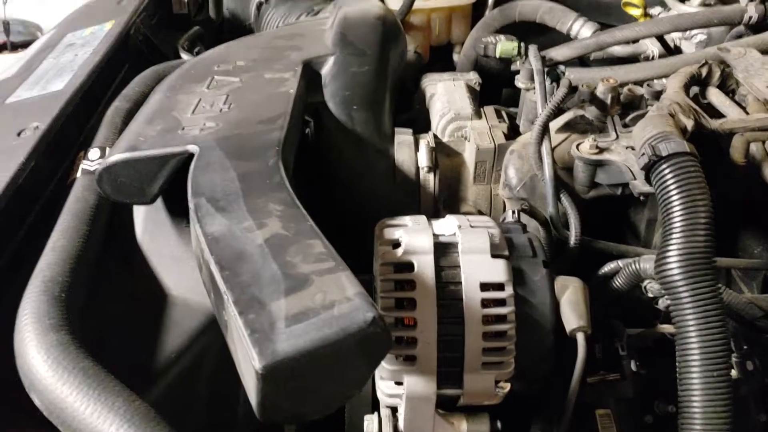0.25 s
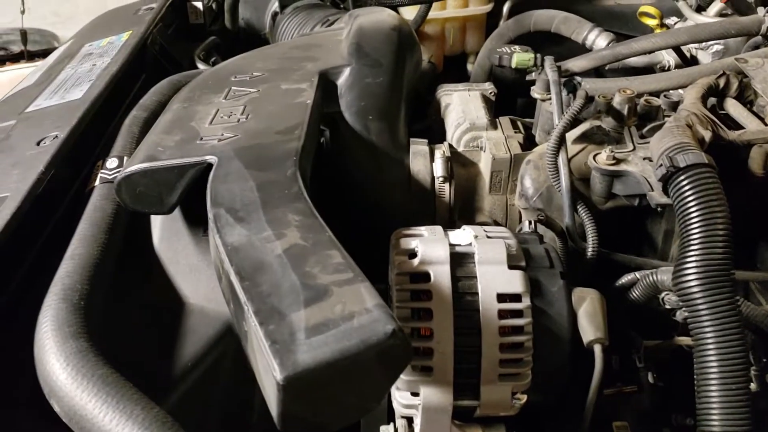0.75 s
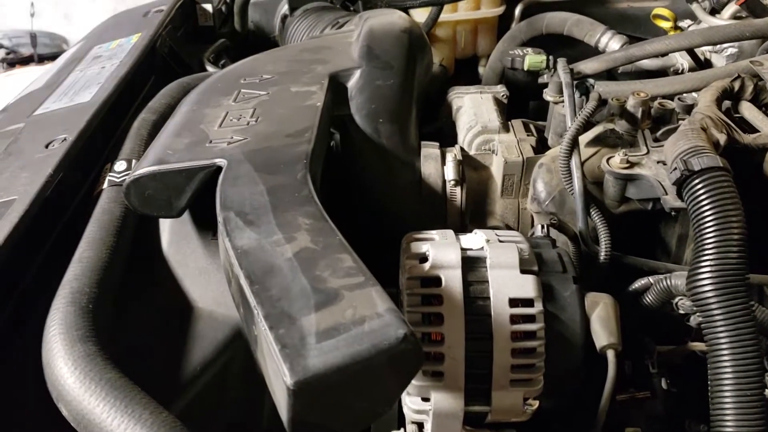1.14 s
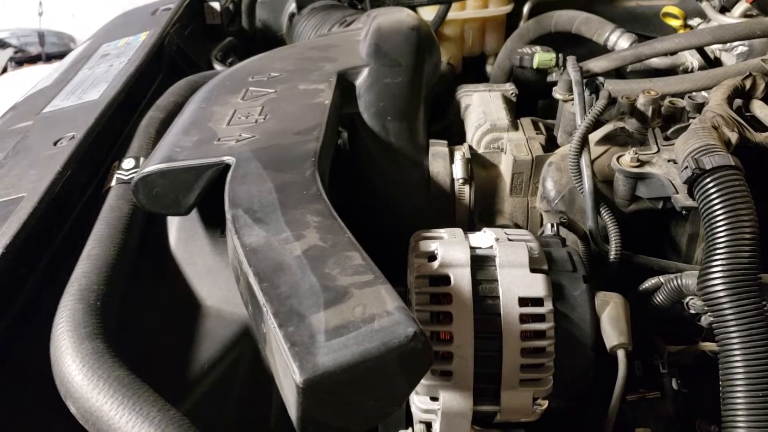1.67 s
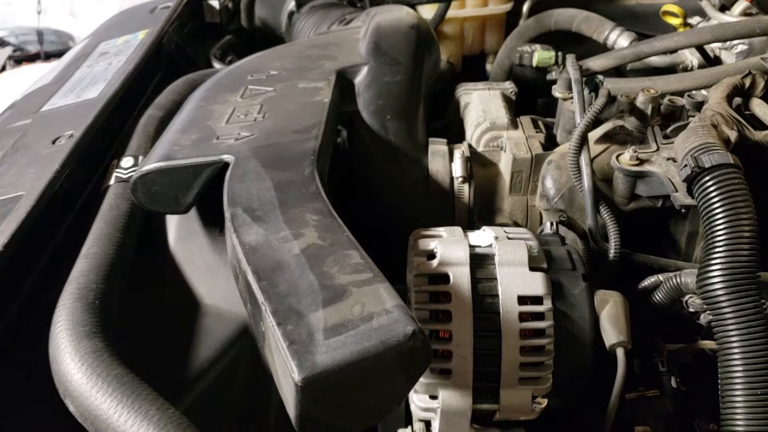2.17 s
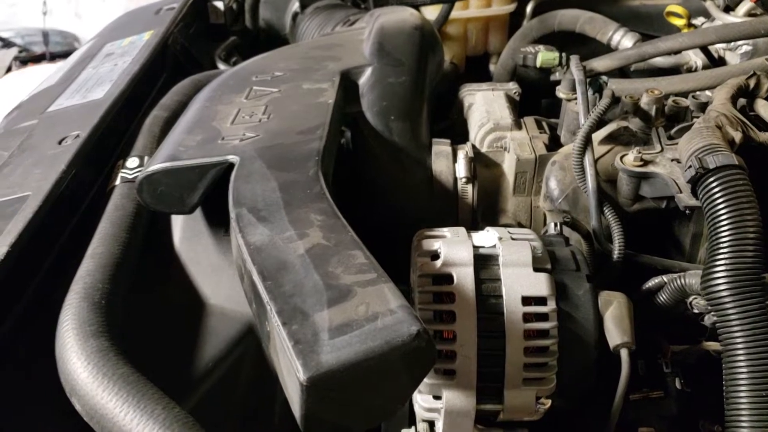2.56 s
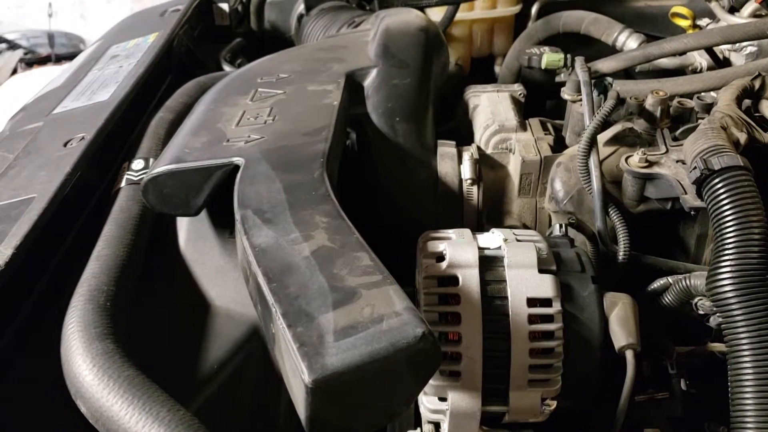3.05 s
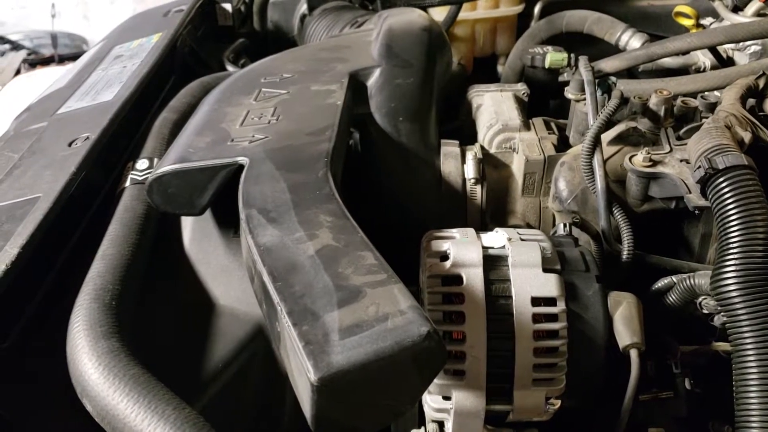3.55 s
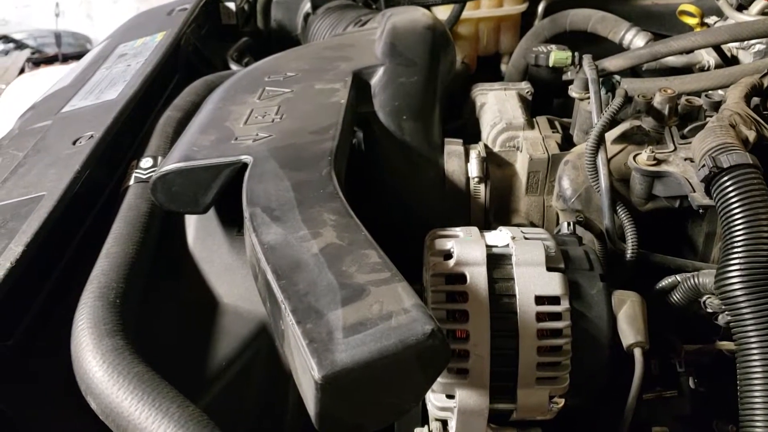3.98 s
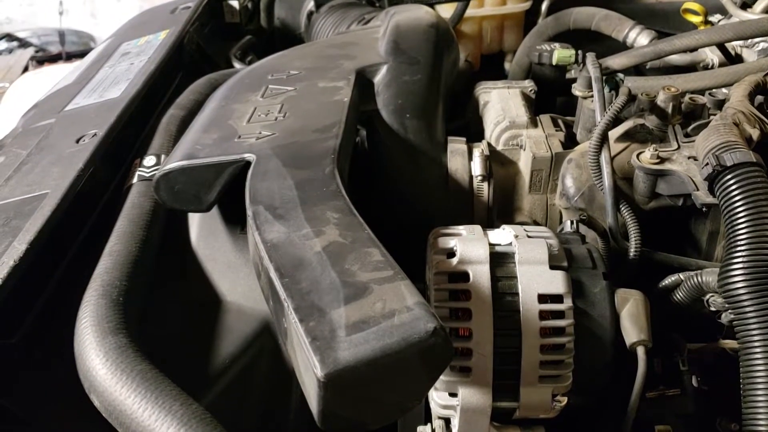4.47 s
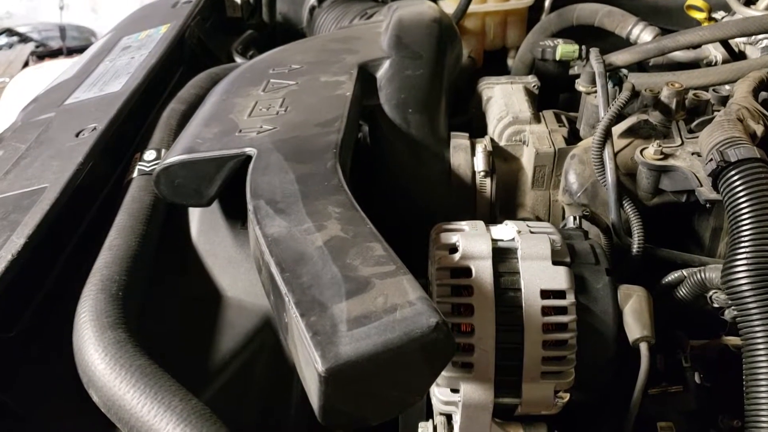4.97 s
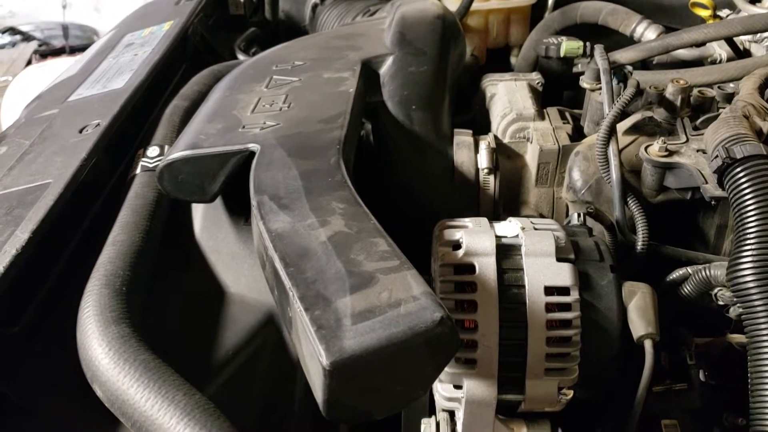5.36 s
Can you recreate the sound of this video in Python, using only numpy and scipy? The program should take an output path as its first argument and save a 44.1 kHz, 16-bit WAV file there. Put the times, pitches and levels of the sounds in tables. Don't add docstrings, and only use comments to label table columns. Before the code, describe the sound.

A starter clunks and cranks, then a large petrol engine catches, flares and settles to idle with a sliding belt squeal and repeating chirps.

```python
import sys
import numpy as np
from scipy import signal
from scipy.fft import rfft, irfft, next_fast_len
from scipy.io import wavfile
from scipy.ndimage import uniform_filter1d

SR = 44100
rng = np.random.default_rng(int(sys.argv[2]) if len(sys.argv) > 2 else 0)


def volts_from_decibels(level):
    exponent = np.asarray(level, float) / 20
    return 10 ** exponent


def store_pcm(level_fs):
    pcm = np.round(np.clip(level_fs, -1, 1) * 32767).astype(np.int16)
    wavfile.write(sys.argv[1], SR, np.atleast_2d(pcm).T)


N = 247930
T, LONG = np.arange(N) / SR, next_fast_len(N + SR // 2)
HZ = np.maximum(np.arange(LONG // 2 + 1) * SR / LONG, 1)

# f/Hz, level per Hz/dB
ROOM_TONE = [(18, -57), (30, -46), (117, -6.5), (141, -14), (382, -28), (645, -17.5), (860, -32),
             (2040, -30), (2950, -37), (3940, -36), (15800, -33)]
# f/Hz, likeness/0-1, lag of the left/rad
PORTS = [(60, 0.89, -0.8), (276, 0.99, 0.44), (296, 0.91, -2.3), (664, 0.97, 1.29), (870, 0.52, 1.63),
         (1120, 0.13, 2), (1560, 0.44, 3.), (1880, 0.27, 7), (1980, 1, 7.5), (2840, 0, 8), (4270, 0, 6.5)]
# f/Hz, left minus right/dB
LEAN = [(60, -6), (110, 1), (200, 0.5), (380, -0.5), (700, 0.5), (1290, -1), (2380, -2), (4400, 0),
        (8120, 0.5), (15000, 1)]

# t/s, level/dB, t60/s, treble share/dB
BLOWS = [
    (.190, -38, 0.072, -6),
    (.212, -27, 0.1, 5.5),
    (.232, -20, 0.078, 1),
    (.535, -28.5, 0.13, -4),
    (.572, -43, 0.088, 5),
    (.668, -22.5, 0.078, -3),
    (.695, -23.5, 0.081, -10),
]
# f/Hz, level/dB, share of the blow's t60
HOUSING = [(62.8, -23.5, 25), (279, -6, 3), (352, -7.5, 1), (499, -11, 1.6), (706, 2, 0.89),
           (1035, -7, 1.4), (1279, 1, 1.5), (1410, -1, 0.34), (2310, 4.5, 0.68), (2770, -4, 0.57),
           (4570, -3, 0.51), (5700, -3, 1.06), (7800, -3, 0.58)]
# t/s, peak level/dB
CRACKS = [(0.19, -11), (0.2124, -6), (0.5447, -13), (0.6684, -7), (0.7114, -12), (0.7564, -10),
          (0.7814, -11), (0.7944, -10), (0.8694, -13)]
# t/s, gear mesh f/Hz
MESH_HZ = [(.26, 450), (.3, 505), (.365, 580), (.39, 622), (.41, 615), (.455, 545), (.52, 550), (.545, 640),
           (.66, 648)]
# multiple of the mesh rate, level/dB
UPPER_MESH = [(6, 0), (9.15, 0), (4.3, -8)]
# t/s, hold/s, third partial level/dB, sixth level/dB, ninth level/dB
WHINES = [(.288, .04, -28, -46, -48), (.352, .012, -24, -44, -48), (.383, .012, -28, -40, -46),
          (.41, .055, -23, -30, -44), (.54, .045, -46, -40, -28), (.57, .05, -30, -32, -32),
          (.63, .06, -48, -44, -34)]
# t/s, hold/s, level/dB, f/Hz, glide/(Hz/s)
GROANS = [
    (.212, .008, -23, 852, -100),
    (.288, .06, -35, 800, 1100),
    (.43, .085, -31, 890, -400),
    (.532, .015, -27, 815, -2500),
    (.568, .015, -31, 760, -1500),
]
# t/s, hold/s, grind level/dB, bite level/dB
STROKES = [(0.193, .02, -46, 7), (0.205, .025, -23, 0.5), (0.268, 0.11, -29.5, -2), (0.378, 0.097, -31, 0),
           (0.494, 0.044, -38, 1.5), (0.537, .05, -28.5, -0.5), (0.618, 0.032, -34.5, -1.5),
           (0.663, 0.0052, -22.5, -1.5), (0.707, 0.048, -39.5, 6), (0.766, 0.054, -29.5, -1)]
# t/s, hold/s, rumble level/dB
SHUDDERS = [
    (0.228, 0.066, -36.5),
    (0.752, .05, -34.5),
]

# firing f/Hz, boom level/dB
PIPE = [(55, -69), (56.2, -47.5), (58.5, -42), (60.4, -42.5), (63, -35), (66, -38), (69, -48), (77, -46.5)]
# multiple of the firing rate, level/dB, share of the boom's swell
SHAFTS = [(1, 0, 1.), (2, -19, .7), (2.27, -31, .4), (3.2, -39, .2), (4.18, -44, .2)]
# t/s, level/dB
LOAD = [(.76, 0.5), (.8, -1), (.93, 0.5), (1.4, -0.5), (1.72, 0.5), (1.8, -1), (2.33, 2), (3.1, 0.5),
        (3.6, -0.5), (4.3, -0.5), (4.6, -0.5), (5.2, 0.5), (5.62, 0.5)]
# low f/Hz, high f/Hz
RANGE_EDGES = [(90, 400), (400, 1400), (2600, 7000), (9000, 15500)]
# running level/dB, share of load, slope/(dB/octave of speed), cranking level/dB, share of bite
RANGES = [(-44.5, 1.8, 9, -16, -0.33), (-35, 1.07, -2.5, 0, 0.08), (-31, 1.66, 2, 1, 1.2),
          (-29.5, 1.35, -2, 0, 1.14)]
# f/Hz, level per Hz/dB
BAY = [(24, -45), (40, -18), (248, -10), (335, -8.5), (643, -2), (1360, -9), (1620, -2.5), (2190, -4.5),
       (2810, -6), (5000, -6), (5960, -9.5), (7840, -9), (9340, -14.5), (13300, -5.5), (15800, -8.5)]
# f/Hz, level/dB
GRIND = [(40, 1), (300, -6), (700, 2), (1300, 8.5), (2200, 4), (4000, 9), (8000, 0.5), (15000, -4)]
# f/Hz, width/Hz, rise/dB
PANELS = [(265, 45, 5), (500, 45, 2), (645, 90, 3), (835, 40, 4), (1256, 45, 4), (1640, 60, 3),
          (2095, 45, 11), (2270, 65, 11), (3230, 150, 2), (4710, 70, 5), (4900, 70, 4), (5690, 80, 3),
          (6800, 300, -3), (7180, 90, 4), (7810, 260, 4), (13300, 190, 2), (13850, 120, 3)]

# t/s, peak level/dB, f/Hz
CHIRPS = [(0.7118, -20, 7910), (0.7497, -22, 7710), (0.9472, -16, 8170), (1.1433, -17, 8020),
          (1.3334, -18, 8140), (1.5309, -18, 8190), (1.7404, -14, 8050), (1.9649, -21, 8230),
          (2.1774, -21, 7840), (2.4473, -15, 8060), (2.7087, -16, 8050), (2.9756, -21, 7930),
          (3.2321, -27, 7730), (3.4945, -20, 7800), (3.7713, -18, 7840), (4.0454, -21, 7520),
          (4.3256, -12, 7640), (4.6064, -17, 7810), (4.8903, -19, 7640), (5.1766, -20, 7820),
          (5.465, -24, 7920)]
# t/s, squeal f/Hz
SPEED = [(.72, 1538), (.8, 1843), (.88, 2184), (.96, 2342), (1.04, 2413), (1.12, 2429), (1.28, 2405),
         (1.6, 2245), (1.84, 2094), (2.32, 1865), (2.48, 1782), (2.64, 1755), (2.96, 1724), (3.24, 1738),
         (3.68, 1729), (4.0, 1694), (4.4, 1642), (5.62, 1610)]
# t/s, squeal level/dB
SLIP = [(.78, -42), (.855, -40), (.87, -27), (.96, -31), (1.12, -33.5), (1.28, -30), (1.37, -34),
        (1.48, -28.5), (1.82, -34.5), (1.94, -47), (2.16, -34.5), (2.34, -33), (2.4, -28), (3.3, -23.5),
        (3.8, -24.5), (4.33, -26.5), (4.37, -38), (5.62, -40)]
# t/s, hold/s, squeal level/dB
SPELLS = [(4.34, .09, -32), (4.55, .06, -34.5), (4.72, .11, -32), (4.98, .06, -34.5), (5.14, .05, -37),
          (5.42, .05, -38)]

SQUEAL_PER_FIRING = 29.4
FLARE_S = 0.865
BURST_RISE_S, STROKE_RISE_S = 0.0047, 0.0093
WHINE_FALL_DB_S, STROKE_FALL_DB_S = 500, 214


def curves(table):
    s, *columns = np.transpose(table)
    return [np.interp(T, s, c) for c in columns]


def over_hz(table, order=1):
    columns = np.transpose(table)
    return np.interp(np.log(HZ), np.log(columns[0]), columns[order])


def bins(x):
    return rfft(x, LONG)


def wave(spectrum):
    return irfft(spectrum, LONG)[..., :N]


def walk(rate):
    k = int(SR / rate)
    held = np.repeat(rng.standard_normal(4000)[:N // k + 1], k)[:N]
    return 1.3 * uniform_filter1d(uniform_filter1d(held, k), k)


def tone(hz, wobble, rate, flutter_db):
    phase = 2 * np.pi * np.cumsum(hz * (1 + wobble * walk(rate))) / SR
    return np.sqrt(2) * volts_from_decibels(flutter_db * walk(rate)) * np.sin(phase)


def bursts(table, levels_db, rise_s, fall_db_s):
    power = 0
    for (s, hold_s, *_), db in zip(table, levels_db):
        fall_db = fall_db_s * np.maximum(T - s - hold_s, 0)
        power = power + (volts_from_decibels(db - fall_db) * np.clip((T - s) / rise_s, 0, 1)) ** 2
    return np.sqrt(power)


def ports(x, pan_db, lag_s):
    turn = np.exp(-1j * np.pi * HZ * lag_s) * volts_from_decibels(pan_db / 2)
    return wave(bins(x) * np.array([turn, 1 / turn]))


def spread(shared, left, right):
    alike = np.clip(over_hz(PORTS), 0, 1)
    turn = np.exp(-.5j * over_hz(PORTS, order=2)) * volts_from_decibels(over_hz(LEAN) / 2)
    common, own = np.sqrt(alike) * bins(shared), np.sqrt(1 - alike)
    return np.array([(common + own * bins(left)) * turn, (common + own * bins(right)) / turn])


def reflections(x, t60_s):
    tail = rng.standard_normal((3, N)) * 1000. ** (-T / t60_s)
    return bins(x) * spread(*tail) / np.sqrt(np.sum(tail[0] ** 2))


def garage():
    hush = wave(spread(*rng.standard_normal((3, N))) * volts_from_decibels(over_hz(ROOM_TONE)))
    return hush * volts_from_decibels(-46) / np.std(hush)


def shudders():
    dull = wave(spread(*rng.standard_normal((3, N))) / (1 + ((HZ - 160) / 90) ** 2))
    rocking = bursts(SHUDDERS, np.transpose(SHUDDERS)[2], STROKE_RISE_S, STROKE_FALL_DB_S)
    return dull / np.std(dull) * rocking


def whistle(firing_hz):
    shut = np.clip((56.2 - firing_hz) / .5, 0, 1) * (T > FLARE_S)
    return ports(shut * volts_from_decibels(-41.5) * tone(6500, .003, 70, 3.), 0, 4e-5)


def cracks():
    clicks = np.zeros(N)
    s, db = np.transpose(CRACKS)
    clicks[(s * SR).astype(int)] = volts_from_decibels(db + 7.0)
    return wave(reflections(clicks, 0.029) * HZ / (HZ + 900))


def gear_whine():
    hz = curves(MESH_HZ)[0]
    third, sixth, ninth = (bursts(WHINES, db, BURST_RISE_S, WHINE_FALL_DB_S)
                           for db in np.transpose(WHINES)[2:])
    hums = [(0.239, 0.25), (WHINES[4][0], .09)]
    first = bursts(hums, [-35.5, -46], BURST_RISE_S, WHINE_FALL_DB_S)
    upper = sum(gain * volts_from_decibels(db) * tone(k * hz, .003 * k, 300, 4.0)
                for (k, db), gain in zip(UPPER_MESH, (sixth, ninth, sixth)))
    lower = tone(hz, 0.015, 61., 1.8) + volts_from_decibels(-8.5) * tone(hz / 2, 0.0069, 54.6, 7.0)
    return third * tone(3 * hz, .009, 90, 2.2) + first * lower + upper


def groans():
    s, _, db, start_hz, glide = np.transpose(GROANS)
    now = np.maximum(np.searchsorted(s, T) - 1, 0)
    hz = np.maximum(start_hz[now] + glide[now] * (T - s[now]), 650)
    return bursts(GROANS, db, BURST_RISE_S, 350) * tone(hz, 0.027, 111.4, 3.5)


def housing_blows():
    out = np.zeros(N)
    chances = rng.standard_normal((len(BLOWS), 2, len(HOUSING)))
    for (s, db, t60_s, treble_db), chance in zip(BLOWS, chances):
        t = np.maximum(T - s, 0)
        for (mode_hz, mode_db, share), detune, luck in zip(HOUSING, *chance):
            gain = volts_from_decibels(db + mode_db + 2 * luck + treble_db * max(np.log2(mode_hz / 1300), 0))
            shape = (1 - np.exp(-t / 0.0011)) * 1000. ** (-t / (t60_s * share))
            out += gain * shape * np.sin(2 * np.pi * mode_hz * (1 + .02 * detune) * t)
    return out


def starter():
    out = gear_whine() + groans() + housing_blows()
    return ports(out, -.4, 4e-5) + volts_from_decibels(-10) * wave(reflections(out, .15))


def boom(firing_hz):
    flare = np.clip(1 + (T - FLARE_S) / 0.054, 0, 1) * np.exp(-np.maximum(T - FLARE_S, 0) / 0.064)
    boom_db = np.interp(firing_hz, *np.transpose(PIPE)) + 19.5 * flare
    boom_db = boom_db - np.clip(-50 - boom_db, 0, 6)
    lines = sum(volts_from_decibels(db + share * boom_db) * tone(k * firing_hz, .006, 12, .9) for k, db, share in SHAFTS)
    shake_db = -63.0 + 33 * np.log2(firing_hz / 58)
    shake = volts_from_decibels(shake_db) * tone(.65 * firing_hz, 0.015, 10, 5.1)
    return ports((lines + shake) * np.clip((T - .74) / 0.051, 0, 1), .3, 0.00031)


def effort(firing_hz):
    stroke_db, bite_db = np.transpose(STROKES)[2:]
    caught = np.clip((T - 0.717) / .05, 0, 1)
    octaves = np.log2(firing_hz / 58)
    load_db = curves(LOAD)[0]
    gains = []
    for run_db, share, slope_db, crank_db, bite in RANGES:
        levels_db = stroke_db + crank_db + bite * bite_db
        cranking = bursts(STROKES, levels_db, STROKE_RISE_S, STROKE_FALL_DB_S)
        running = caught * volts_from_decibels(run_db + share * load_db + slope_db * octaves)
        gains.append(np.hypot(cranking, running))
    return gains


def layers(sound, gains):
    out, centres = 0, np.log([np.sqrt(lo * hi) for lo, hi in RANGE_EDGES])
    for (lo, hi), gain, pick in zip(RANGE_EDGES, gains, np.eye(4)):
        inside = (HZ > lo) & (HZ < hi)
        rms = np.sqrt(2 * np.sum(np.abs(sound.mean(axis=0)[inside]) ** 2) / N / LONG)
        out = out + wave(sound * np.interp(np.log(HZ), centres, pick)) * gain / rms
    return out


def roar(firing_hz):
    throb = volts_from_decibels(0.86 * np.cos(2 * np.pi * np.cumsum(firing_hz) / SR) + 1.3 * walk(5.4))
    air = throb * rng.standard_normal((4, N))
    near = .55 * np.clip(HZ / 3100, 0, 1) ** 6
    rush = np.sqrt(1 - near) * spread(*air[1:]) + np.sqrt(near) * reflections(air[0], 0.096)
    chance = rng.random((2, N))
    ticks = (chance[0] < 300 / SR) * volts_from_decibels(18.4 * chance[1] ** 2)
    ticks = reflections(ticks / np.std(ticks), 0.081) * HZ / (HZ + 2500)
    sound = (rush + volts_from_decibels(-2.5) * ticks) * volts_from_decibels(over_hz(BAY))
    rise = 1 + sum((volts_from_decibels(2 * db) - 1) / (1 + (2 * (HZ - hz) / width) ** 2) for hz, width, db in PANELS)
    gains = [gain * volts_from_decibels(0.74 * walk(14)) for gain in effort(firing_hz)]
    running = np.clip((T - .78) / 0.11, 0, 1)
    grind = layers(sound * volts_from_decibels(over_hz(GRIND)), gains)
    return (1 - running) * grind + running * layers(sound * np.sqrt(rise), gains)


def chirps():
    out = np.zeros((2, N))
    t = T[:int(.06 * SR)]
    waver, stutter = walk(400), volts_from_decibels(3.03 * walk(330))
    for (s, db, hz), (turn, side) in zip(CHIRPS, rng.random((len(CHIRPS), 2))):
        pan_db = 6 * side - 4
        i = int((s - .005) * SR)
        shape = np.e * t / 0.013 * np.exp(-t / 0.0043) * stutter[i:i + len(t)]
        sag_hz = hz * (1 + 0.0061 * np.exp(-t / 0.0049) + 0.019 * waver[i:i + len(t)])
        phase = 2 * np.pi * np.cumsum(sag_hz) / SR + np.array([[0], [2 * turn]])
        gain = volts_from_decibels(db + 5.0 + np.array([[pan_db], [-pan_db]]) / 2)
        out[:, i:i + len(t)] += gain * shape * np.sin(phase)
    return out + volts_from_decibels(2.0) * wave(reflections(out.mean(axis=0), 0.05))


def squeal(hz, db):
    faint = np.clip((-30 - db) / 7, 0, 1)
    note = tone(hz, 0.00453, 55, 1.05)
    note = note + volts_from_decibels(-16.0) * tone(hz, 0.02597, 160, 0.72)
    note = note + volts_from_decibels(-22.5) * tone(2 * hz, 0.00484, 45, 1.7)
    flicker_db = faint * (2 * walk(30) + 2 * walk(8) - 4)
    note = note * volts_from_decibels(db + 1 + flicker_db) * (T > SPEED[0][0])
    return ports(note, -1.1, 1.2e-5) + volts_from_decibels(-15) * wave(reflections(note, .1))


def scene():
    squeal_hz = curves(SPEED)[0]
    firing_hz = squeal_hz / SQUEAL_PER_FIRING
    spells = bursts(SPELLS, np.transpose(SPELLS)[2], .04, 180)
    squeal_db = 20 * np.log10(np.hypot(volts_from_decibels(curves(SLIP)[0]), spells))
    engine = roar(firing_hz) + squeal(squeal_hz, squeal_db) + boom(firing_hz) + chirps()
    return engine + starter() + cracks() + garage() + whistle(firing_hz) + shudders()


def roll_off(x):
    return signal.sosfilt(signal.butter(12, 17000, fs=SR, output="sos"), x)


def record(dry):
    steep = signal.ellip(12, .2, 95, 15840, fs=SR, output="sos")
    mix = signal.sosfilt(steep, dry)
    return roll_off(mix)


dry = scene()
out = record(dry)
store_pcm(out)
```